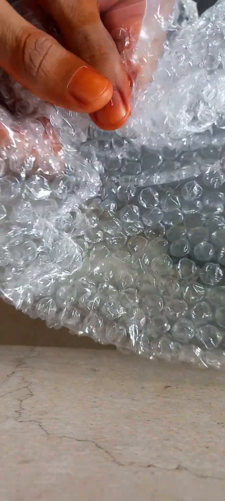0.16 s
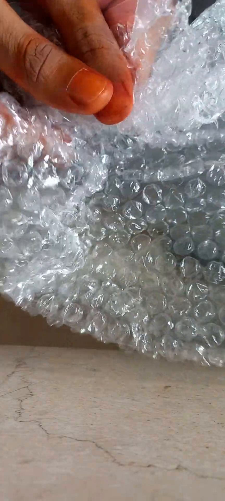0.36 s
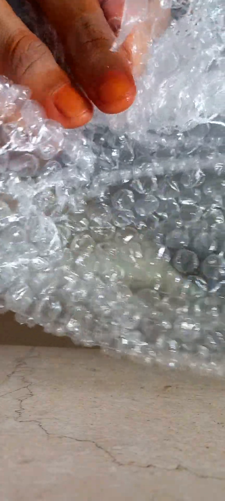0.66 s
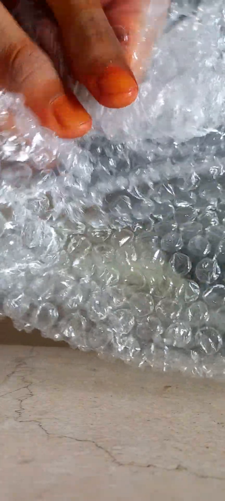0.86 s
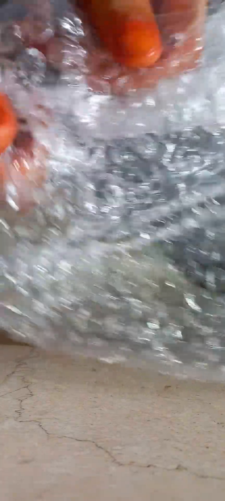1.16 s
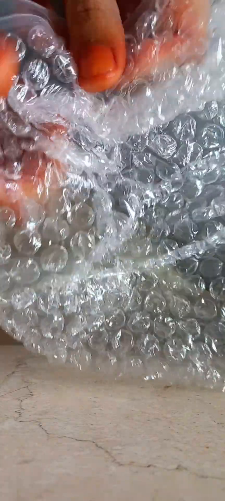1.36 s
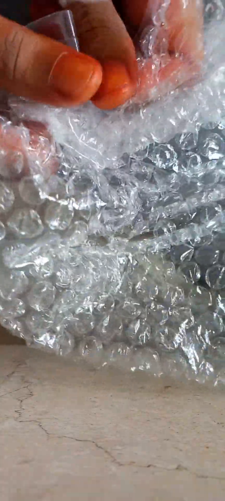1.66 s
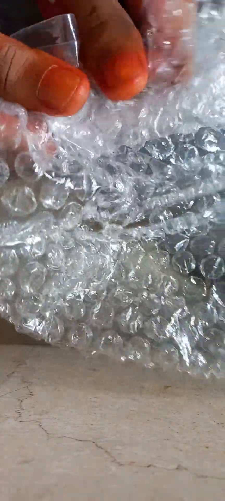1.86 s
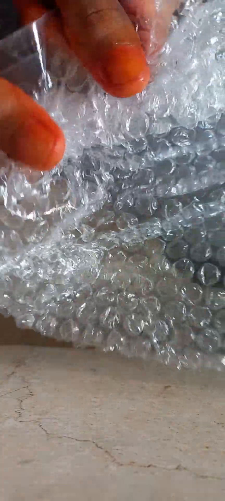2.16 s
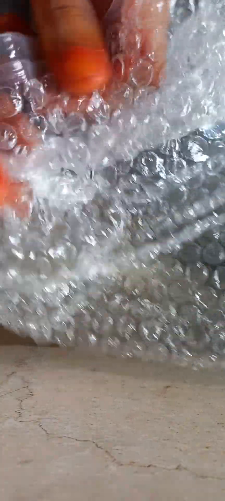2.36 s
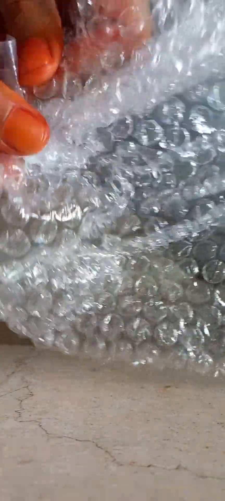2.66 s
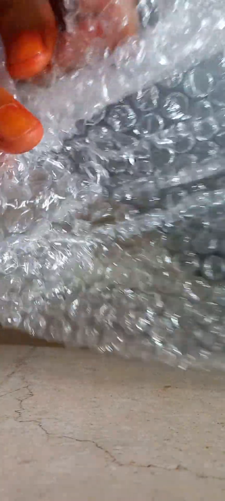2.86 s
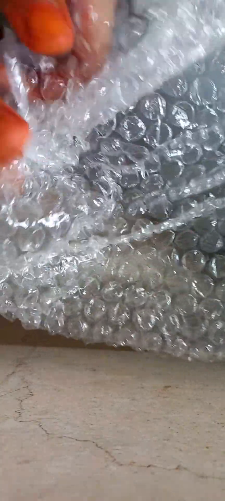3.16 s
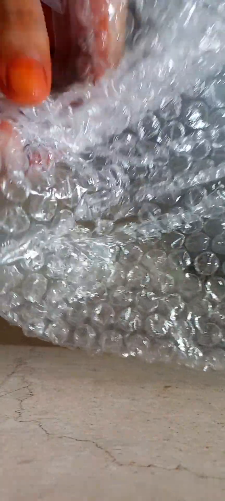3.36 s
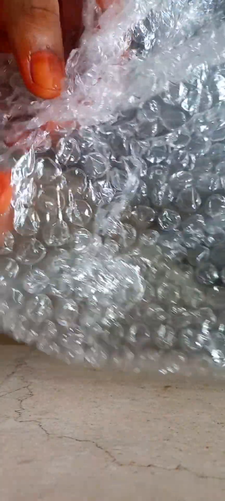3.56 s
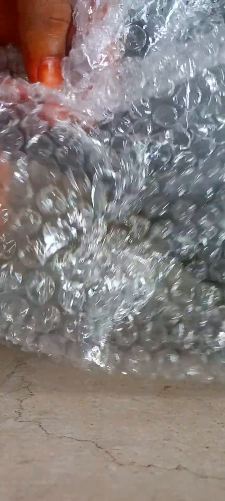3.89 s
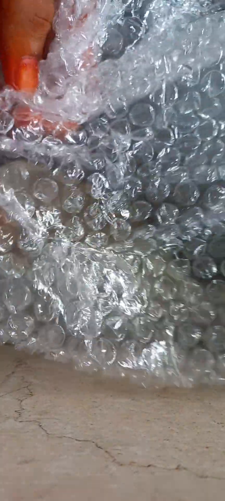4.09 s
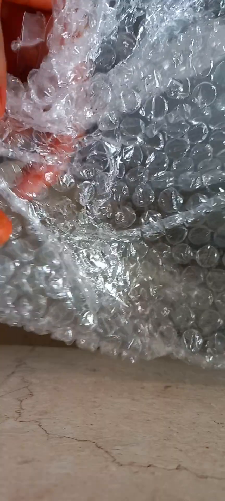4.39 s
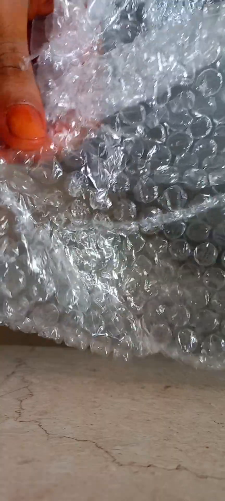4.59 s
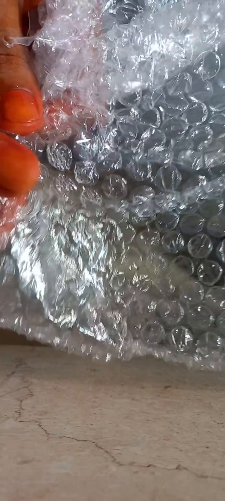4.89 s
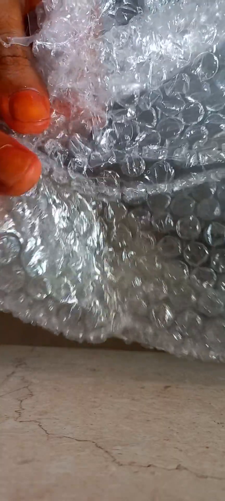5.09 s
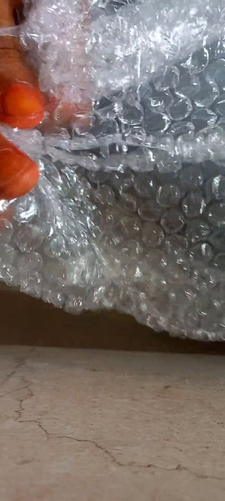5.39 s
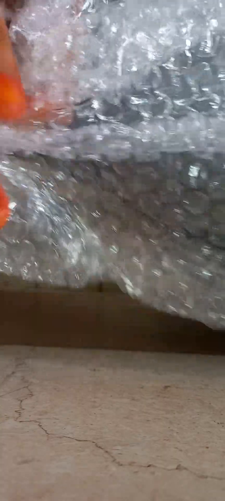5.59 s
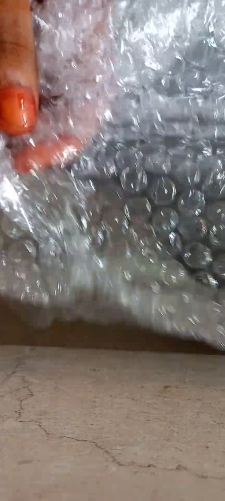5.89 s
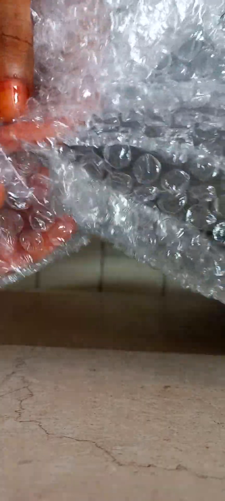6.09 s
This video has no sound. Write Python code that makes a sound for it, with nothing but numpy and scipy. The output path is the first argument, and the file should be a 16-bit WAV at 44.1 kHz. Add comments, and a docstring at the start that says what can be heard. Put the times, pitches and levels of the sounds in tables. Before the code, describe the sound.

Two hands squeeze and twist bubble wrap close to the microphone, toward the left, in a hard, echoing room. A faint, low appliance hum runs throughout. The plastic crinkles in uneven swells with sharp crease snaps, and three bubbles burst right at the start. A fingertip rubs briefly over a taut bubble at 0.5 seconds, followed by single pops at 0.7 and 0.9 and a soft knock near 1.2. Around 2 seconds comes the loudest moment, a rapid run of pops with air puffs thumping the microphone and a very short hiss. A lone pop sounds near 2.9. Crinkling and snapping grow busier from 3.4 to 4.1, then a tight cluster of pops at 4.3 leaves a dull wash. A last run of four pops falls between 5.1 and 5.4, and the wrap crinkles and snaps on until just past 6 seconds.

```python
"""Two hands squeeze and twist bubble wrap by a camera's left port, in a hard, echoing room.
A mains appliance hums throughout. At once the film crinkles, creases snap and three bubbles burst;
a fingertip drags over a taut cell, then come two single pops and a soft knock. Near 2 s a run of pops
works the limiter, puffs of air thump the mic and a split cell hisses. A lone pop follows near 3 s, a
cluster with a dull wash after it at 4.3 s, a last run after 5 s; the film crinkles on to the end."""
import sys
import numpy as np
from scipy import signal
from scipy.fft import rfft, irfft
from scipy.io import wavfile
from scipy.ndimage import uniform_filter1d, minimum_filter1d

SR = 44100
rng = np.random.default_rng(int(sys.argv[2]) if len(sys.argv) > 2 else 0)


def wav_record(signal):
    """Record a signal, one row per channel, as 16-bit PCM in the file named by sys.argv[1]."""
    frames = np.transpose(np.atleast_2d(signal))
    bounded = np.clip(frames, -1, 1)
    # unit amplitude maps onto the largest positive 16-bit level
    quanta = np.round(bounded * 32767).astype(np.int16)
    wavfile.write(sys.argv[1], SR, quanta)


N = 275184
TIME_S = np.arange(N) / SR
SCENE_HZ, FILTER_HZ = np.fft.rfftfreq(N, 1 / SR), np.fft.rfftfreq(2048, 1 / SR)


def amp(db):
    """Decibels to gain."""
    return 10 ** (np.asarray(db) / 20)

def unit_rms(x):
    """Scales to rms 1."""
    return x / np.sqrt(np.mean(x ** 2) + 1e-20)

def at_hz(points, hz=FILTER_HZ):
    """Reads a curve on a log-frequency axis."""
    freq_hz, value = np.transpose(points)
    return np.interp(np.log(hz + 1), np.log(freq_hz + 1), value)

def automation(rows):
    """Each column of a timed table, at every sample."""
    time_s, *columns = np.transpose(rows)
    return [np.interp(TIME_S, time_s, column) for column in columns]

def add(mix, start_s, sound):
    """Mixes a sound in at start_s."""
    part = mix[..., max(round(start_s * SR), 0):][..., :sound.shape[-1]]
    part += sound[..., :part.shape[-1]]

def click(spectrum_db):
    """The tightest click with this spectrum (minimum phase)."""
    log_gain = np.log(amp(np.maximum(spectrum_db, -100)))
    mirrored = np.concatenate([log_gain, log_gain[-2:0:-1]])
    return irfft(np.exp(np.conj(signal.hilbert(mirrored)))[:len(spectrum_db)])

def convolve(x, response):
    """Filters along time, cut to the scene's length."""
    return signal.fftconvolve(np.atleast_2d(x), np.atleast_2d(response), axes=1)[:, :N]

def drift(rate_hz):
    """A smooth random wobble of rms 1."""
    return unit_rms(irfft(rfft(rng.standard_normal(N)) * np.exp(-(SCENE_HZ / rate_hz) ** 2), N))


# hum partials: pitch_hz, level_db
HUM_PARTIALS = [(60, -86), (100, -54.5), (112, -61), (167, -70.5), (233, -70)]
# EQ of the low drone and faint hiss: freq_hz, gain_db
DRONE_EQ = [(20, -49), (35, -22), (60, 8.5), (90, 6.5), (115, 11.5), (170, 7), (280, -7), (600, -14.5),
            (1500, -51), (5000, -45), (8500, -66), (16000, -56)]
# fader ride on hum and drone together: time_s, gain_db
APPLIANCE_RIDE = [(0, -8), (.21, -2.5), (.42, -10), (.56, 1.5), (1.3, 0), (1.8, 0), (2.4, -2), (2.8, -10),
                  (2.98, -2.5), (3.38, -5), (3.6, 2.5), (4.06, -4.5), (4.25, 1), (4.9, -0.5), (5.6, -2.5),
                  (6.24, 1.5)]

def appliance(drone_db=-56, flicker_db=2, waver_db=1.5):
    """A mains appliance: wavering hum partials over a low drone and faint hiss."""
    swell = amp(automation(APPLIANCE_RIDE)[0] + flicker_db * drift(7.7))
    hum = np.zeros(N)
    for pitch_hz, level_db in HUM_PARTIALS:
        peak = np.sqrt(2) * amp(level_db + waver_db * drift(0.74))
        hum += peak * np.sin(2 * np.pi * pitch_hz * TIME_S + 0.5 * drift(9.3))
    left, unrelated = rfft(rng.standard_normal((2, N)))
    alike = 0.86 / (1 + (SCENE_HZ / 300) ** 2)  # only long waves reach both ports alike
    right = alike * left + np.sqrt(1 - alike ** 2) * unrelated
    drone = unit_rms(irfft(np.array([left, right]) * amp(at_hz(DRONE_EQ, SCENE_HZ)), N))
    return (hum + amp(drone_db) * drone) * swell * amp([[0.6], [-0.4]])


def cell_scatter(amount, t60_s, count=1):
    """Impulses, each trailed by a few ms of scatter among the neighbouring cells."""
    t = np.arange(512) / SR
    tail = rng.standard_normal((count, len(t))) * amp(-60 * t / t60_s)
    tail *= 1 - np.exp(-(t / 0.00093) ** 2)
    return (t == 0) + amount * tail / np.linalg.norm(tail, axis=1, keepdims=True)

def crinkle(level_db, eq, ring_range_hz, ring_db, spread_db, clump_db, scatter, t60_s, count):
    """Many small creases buckle in clumps; each rings its own patch of film."""
    when, pitch, chance = rng.random((count, 3)).T
    onset = (when * N).astype(int)
    strength = np.minimum(-np.log(1 - chance), 4)
    size = amp(spread_db * strength + clump_db * drift(11.7)[onset])
    # level_db sets the power, chance shares it among the creases
    power = uniform_filter1d(np.bincount(onset, size ** 2, N), size=3000)
    size = size / np.sqrt(abs(power[onset]) + 1e-9) * amp(level_db[onset])
    low_hz, high_hz = ring_range_hz
    ring_hz = low_hz * (high_hz / low_hz) ** pitch[:, None]
    hz = FILTER_HZ[::2] + 1
    ring = 1 + amp(ring_db) / (1 + 1j * (hz / ring_hz - ring_hz / hz) / 0.32)
    ticks = rfft(cell_scatter(scatter, t60_s, count), 2 * len(hz) - 2)
    grains = irfft(ticks * ring * rfft(click(at_hz(eq, hz))))
    grains *= size[:, None] / np.sqrt(np.mean(np.sum(grains ** 2, axis=1)))
    positions = onset[:, None] + np.arange(grains.shape[1])
    return np.bincount(positions.ravel(), grains.ravel(), N)[:N]


# one swell a row: start_s, attack_s, length_s, crisp_db, dull_db
# the hands' squeezes, except at 4.32 s: a dull wash, like room sound lingering after the pops
SWELL_CUES = [(-.04, .03, 0.042, -44.5, -51.5), (.255, 0.045, 0.092, -47.5, -55),
              (0.426, .04, 0.067, -49.5, -63), (0.524, 0.043, 0.11, -53, -47),
              (0.725, .06, 0.13, -52.5, -52), (1.047, 0.084, .14, -50, -50.5),
              (1.228, 0.044, 0.18, -51, -63.5), (1.477, 0.08, .12, -44.5, -55), (1.6, .04, 0.27, -50, -74),
              (2.257, .05, 0.17, -52, -63), (2.54, 0.033, 0.098, -57, -61.5), (2.63, .04, .06, -48, -57.5),
              (3.166, 0.054, 0.13, -51, -57), (3.384, 0.081, .21, -45.5, -52),
              (3.683, 0.055, .09, -45.5, -55), (3.82, 0.092, .13, -41.5, -48.5),
              (3.975, .05, 0.11, -48, -51.5), (4.171, 0.048, 0.13, -49, -56.5),
              (4.32, 0.054, 0.11, -60, -45), (4.558, 0.052, 0.17, -46.5, -50.5),
              (4.906, 0.056, .16, -47.5, -53.5), (5.097, .04, 0.42, -50.5, -53.5),
              (5.574, 0.044, .19, -48.5, -53), (5.836, 0.077, 0.23, -46.5, -50),
              (6.117, 0.045, 0.097, -46, -55)]
# EQ of the crisp crinkle: freq_hz, gain_db
CRISP_EQ = [(200, -62), (900, -5.5), (2000, 1), (3000, -3), (4500, 1), (6000, -2.5), (8000, -6),
            (12000, -3.5), (16000, -5)]
# EQ of the dull rustle: freq_hz, gain_db
DULL_EQ = [(80, -7.5), (200, 6), (400, -5), (600, -1), (1000, -8), (1600, -12), (3000, -18), (8000, -25)]

def rustle_swells(release_s=0.023, dull_trim_db=-1):
    """Swells of crisp crinkle and dull rustle build, hold and die away."""
    power = np.outer(amp([-61, -74]) ** 2, np.ones(N))  # the film never lies quite still
    for start_s, attack_s, length_s, *levels_db in SWELL_CUES:
        rise = np.sin(np.pi / 2 * np.clip((TIME_S - start_s) / attack_s, 0, 1)) ** 2
        fall = np.exp(-np.maximum(TIME_S - start_s - length_s, 0) / release_s)
        power += np.outer(amp(levels_db), rise * fall) ** 2
    crisp_db, dull_db = 10 * np.log10(power)
    crisp = crinkle(crisp_db, CRISP_EQ, ring_range_hz=(2500, 15000), ring_db=11,
                    spread_db=3.5, clump_db=1, scatter=0.78, t60_s=0.0039, count=2800)
    dull = crinkle(dull_db + dull_trim_db, DULL_EQ, ring_range_hz=(300, 1800), ring_db=13,
                   spread_db=4, clump_db=4, scatter=0.56, t60_s=0.0053, count=1500)
    return crisp + dull


def bell(gain_db, centre_hz, width):
    """A bell EQ in dB; width is a fraction of the centre frequency."""
    return gain_db / (1 + ((FILTER_HZ - centre_hz) / (width * centre_hz)) ** 2)

# base EQ of every snap and pop: freq_hz, gain_db
CRACK_EQ = [(40, -28), (150, -11), (450, 0), (1000, -1.5), (2000, -4), (3000, -1.5), (4400, -3), (6000, -5),
            (8000, -7.5), (12000, -9.5), (16000, -19.5), (18000, -27)]

def cracks(cues, ring_width, scatter, t60_s, cells_db):
    """Sudden releases of film or air, each with its own brightness and ring: (direct, room send)."""
    direct, send = np.zeros((2, N))
    # the tilt folds back in the bass: a soft burst is a hollow thud, weak at both ends
    octaves = np.log2((FILTER_HZ + 650 ** 2 / (FILTER_HZ + 80)) / 3000)
    cells_eq = bell(cells_db, centre_hz=4700, width=0.17)  # intact cells ring on the way to the mic
    for start_s, level_db, tilt_db, ring_hz, ring_db, send_db in cues:
        colour_db = level_db + at_hz(CRACK_EQ) + tilt_db * octaves + bell(ring_db, ring_hz, ring_width)
        crack = signal.fftconvolve(click(colour_db + cells_eq), cell_scatter(scatter, t60_s)[0])
        add(direct, start_s, crack)
        add(send, start_s, amp(send_db) * click(colour_db))
    return np.array([direct, send])


# one snap a row: start_s, level_db, tilt_db_per_octave, ring_hz, ring_db
SNAP_CUES = [(0.0422, -22, 3, 4700, 13), (0.2761, -10.5, -2, 12900, 17), (.5814, -10.5, -1, 4380, 16.5),
             (0.5936, -23, 9, 4200, 14.5), (1.1295, -13, 0.5, 3500, 0.5), (1.2338, -15, 0.5, 4370, 4),
             (1.4182, -23, -5, 3900, 14.5), (1.5603, -16, 3.5, 3720, 15.5), (1.567, -22, 7, 4300, 1),
             (1.7040, -22, 4.5, 5070, 12.5), (2.6172, -25.5, 1, 4900, 16.5), (3.7640, -18, -2, 3840, 7),
             (2.8396, -15, 8, 2830, 8), (2.8813, -19.5, 2.5, 5330, 8), (3.4885, -9, -2, 1340, 8.5),
             (3.5060, -15.5, -1, 4970, 5), (3.5465, -16, -5.5, 4120, -5), (3.5710, -17, -7, 5160, -4),
             (3.7239, -17.5, 0, 4370, 7), (3.8959, -12.5, .5, 5100, 6), (3.9178, -7, 1, 3230, 9),
             (4.0275, -15.5, -3, 4800, 12), (4.4813, -16, -1, 4460, 13), (4.5336, -14.5, -3, 5330, 20),
             (4.6292, -19, 0, 3980, 16.5), (4.6773, -9.5, -6, 4030, 1), (4.709, -20.5, -12, 4120, 8.5),
             (5.1000, -12.5, 2.5, 4570, 3), (5.1150, -21, 5, 4500, 15), (5.5827, -18, 4.5, 5200, 6),
             (5.687, -9, 5.5, 5970, 3.5), (5.961, -15, -1.5, 4580, 9), (6.1800, -12.5, -2, 5130, -8),
             (6.1966, -15, -4.5, 5330, 16.5), (6.2173, -17.5, -7, 4430, 4)]

def crease_snaps(send_db=-7):
    """Large creases snap over and ring the film."""
    cues = [(*cue, send_db) for cue in SNAP_CUES]
    return cracks(cues, ring_width=0.2, scatter=0.63, t60_s=0.0087, cells_db=-0.5)


# one pop a row: start_s, level_db, tilt_db_per_octave, ring_hz, ring_db, send_db
POP_CUES = [(.0762, -0.5, -2, 1630, 8.5, 0.5), (.0847, -1.5, -4.5, 5360, 12, -6.5),
            (.1217, 6.5, -1, 4300, 5, -2.5), (.6725, 8, -4, 2070, 3, -5.8),
            (.8879, 14, -1.36, 4750, 3, -8.5), (1.8822, 9.5, 1.6, 3800, 4.5, -5),
            (1.9611, 14, 1.5, 4640, 5.5, -15), (1.9896, 6.5, 1.5, 5600, 5.5, -7),
            (2.0404, 18, 1, 5000, 2, -22), (2.0573, 4, 0, 4170, 6.5, -20),
            (2.0721, 6.5, 6, 12000, -11.5, -0.5), (2.1127, 13.5, 1.5, 4150, 5.5, -9),
            (2.9418, 13, 0.6, 5200, 5, -10), (4.2788, 3.5, 2.5, 4800, 2.5, -9.5),
            (4.2973, 15.5, 3.5, 4300, 4.5, -7), (4.3013, 11, -2.5, 1846, 13.5, -7.5),
            (5.1337, 3.5, 3.5, 5120, 0, -1), (5.2137, 9.5, 4.5, 4500, 0, -5.5),
            (5.2736, 1, 2.5, 2800, 9, -6.5), (5.3826, 2.5, 0.6, 4200, 3.5, -8)]

def bubble_pops():
    """Bubbles burst: the air escapes at once and the torn cell rings."""
    return cracks(POP_CUES, ring_width=0.16, scatter=0.41, t60_s=0.013, cells_db=3)


# the fingertip's stroke: time_s, level_db, pitch_hz
RUB_STROKE = [(.46, -85, 449), (.49, -52, 417.5), (.52, -51, 391), (.57, -52, 401.3), (.63, -55, 425),
              (.67, -66, 390)]

def finger_rub(width_hz=95):
    """Skin drags over a taut cell whose resonance sags."""
    level_db, pitch_hz = automation(RUB_STROKE)
    pole = np.exp(-np.pi * width_hz / SR)
    friction = signal.lfilter([1], [1, -2 * pole, pole ** 2], rng.standard_normal(N))
    drag = unit_rms(friction * np.cos(2 * np.pi * np.cumsum(pitch_hz) / SR))
    touching = (TIME_S > RUB_STROKE[0][0]) & (TIME_S < RUB_STROKE[-1][0])
    return drag * amp(level_db) * touching


# one thump a row: start_s, level_db, pitch_hz, t60_s
THUMP_CUES = [(1.160, -36, 552, 0.04), (1.883, -34, 123, .1), (1.987, -22.5, 77, 0.12),
              (1.994, -18.5, 228, 0.028), (2.945, -38, 79.5, 0.13), (3.578, -40, 200, 0.13),
              (3.855, -34, 1030, 0.035), (4.300, -32, 65, 0.11), (4.303, -31.5, 267, 0.14),
              (4.680, -34, 320, 0.048), (4.705, -42, 580, 0.12), (5.957, -39, 245.5, 0.14)]

def dull_thumps():
    """Air puffs from bursting bubbles hitting the mic, and soft knocks on the wrap: damped tones."""
    thumps, t = np.zeros(N), TIME_S[:SR // 2]
    for start_s, level_db, pitch_hz, t60_s in THUMP_CUES:
        envelope = amp(level_db - 60 * t / t60_s) * (1 - np.exp(-t * pitch_hz))
        add(thumps, start_s, envelope * np.sin(2 * np.pi * pitch_hz * t))
    return thumps


# EQ of the escaping air: freq_hz, gain_db
LEAK_EQ = [(500, -30), (2000, -3.5), (4800, -1), (8000, 1.5), (12000, -8), (16000, -25)]

def air_leak(start_s=2.001, length_s=0.033, level_db=-24.5):
    """A short hiss swells and stops as a split cell empties."""
    hiss = unit_rms(convolve(rng.standard_normal(N), click(at_hz(LEAK_EQ)))[0])
    progress = np.clip((TIME_S - start_s) / length_s, 0, 1)
    return amp(level_db) * hiss * np.sqrt(abs(np.sin(np.pi * progress)))


# EQ of the reverb tail: freq_hz, gain_db
TAIL_EQ = [(60, 0), (200, 1), (600, -4), (1500, 0.4), (4500, 0.3), (8000, -0.45), (16000, 1.3)]
# decay of the tail: freq_hz, t60_s
TAIL_DECAY = [(100, 0.39), (400, 0.98), (1000, 0.86), (3000, 0.78), (5500, 0.69), (10000, 0.61),
              (16000, 0.51)]
# first reflections off the walls: delay_s, left_gain, right_gain
WALL_ECHOES = [(0.0148, 0.11, 0.089), (0.0196, 0.074, 0.099), (0.022, 0.062, 0.075), (0.039, 0.053, 0.064)]

def room(send, build_s=0.01, patterns=5, crossfades_per_s=35):
    """Hard walls: a few echoes and a dense tail whose pattern the moving hands keep changing."""
    wet = np.zeros((2, N))
    for k in range(patterns):
        hz, t, bands = signal.stft(rng.standard_normal((2, SR)), SR, nperseg=256)
        bands *= amp(at_hz(TAIL_EQ, hz)[:, None] - 60 * t / at_hz(TAIL_DECAY, hz)[:, None])
        tail = signal.istft(bands, SR, nperseg=256)[1]
        tail *= 1 - np.exp(-(TIME_S[:tail.shape[1]] / build_s) ** 2)
        turn = (TIME_S * crossfades_per_s + k) % patterns
        fade = np.sin(np.pi / 2 * turn) * (turn < 2)  # the patterns take turns at constant power
        wet += convolve(send * fade, tail / np.linalg.norm(tail, axis=1, keepdims=True))
    for delay_s, *gains in WALL_ECHOES:
        add(wet, delay_s, np.outer(gains, send))
    return wet


def scene(pop_gain_db=4, snap_gain_db=2, texture_send_db=-4, shadow_db=-14, lag_s=0.000468):
    """Direct sound reaches the left port first; the right one is shaded and hears mostly the room."""
    texture = rustle_swells() + finger_rub() + dull_thumps() + air_leak()
    direct, send = amp(pop_gain_db) * bubble_pops() + amp(snap_gain_db) * crease_snaps()
    left = direct + texture
    shade = amp(shadow_db * (SCENE_HZ + 450) / (SCENE_HZ + 700))
    delay = np.exp(-2j * np.pi * SCENE_HZ * lag_s)
    right = irfft(rfft(left) * shade * delay, N)
    reverb = amp([[-1.5], [-0.5]]) * room(send + amp(texture_send_db) * texture)
    return np.array([left, right]) + reverb + appliance()


def release(reduction_db, db_per_s):
    """Catches each peak of gain reduction and lets it fall at a steady rate."""
    ramp_db = db_per_s * TIME_S
    return np.maximum.accumulate(reduction_db + ramp_db) - ramp_db

# resonances of the left mic port: freq_hz, gain_db
LEFT_PORT_EQ = [(100, 1), (4000, 2), (5800, 5.5), (7000, -5.5), (8300, -11), (10000, -4), (12500, 1),
                (16000, 2)]
# resonances of the right mic port: freq_hz, gain_db
RIGHT_PORT_EQ = [(100, 3.5), (4000, -0.2), (5800, 1.6), (7000, -0.7), (8300, -5.5), (10000, -3),
                 (12500, -1.5), (16000, -0.5)]

def record(dry, overload_db=8, low_cut_hz=42, ceiling_db=-1.2, high_cut_hz=16250):
    """Mic overload, port resonances, low cut, a stereo-linked look-ahead limiter, high cut."""
    x = amp(overload_db) * np.tanh(dry / amp(overload_db))  # the nearest bursts overload the mic
    x = convolve(x, [click(at_hz(LEFT_PORT_EQ)), click(at_hz(RIGHT_PORT_EQ))])
    x = signal.sosfilt(signal.butter(3, low_cut_hz, "hp", fs=SR, output="sos"), x)
    over_db = np.maximum(20 * np.log10(abs(x).max(0) + 1e-9) - ceiling_db, 0)
    # about half of the reduction lets go quickly, the rest slowly
    reduction_db = np.maximum(release(over_db, db_per_s=800), release(0.47 * over_db, db_per_s=110))
    look_ahead_db = minimum_filter1d(-reduction_db, size=301)
    x = x * amp(uniform_filter1d(look_ahead_db, size=301))
    high_cut = signal.firwin(255, high_cut_hz, window=("kaiser", 8), fs=SR)
    return signal.oaconvolve(x, high_cut[None], "same")


dry = scene()
out = record(dry)
wav_record(out)
```